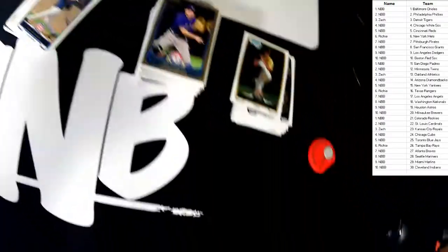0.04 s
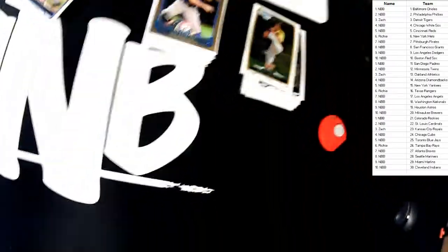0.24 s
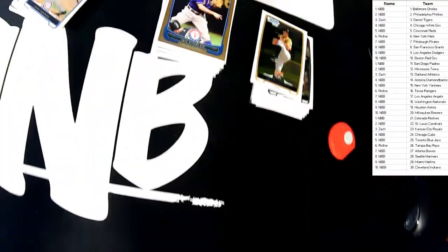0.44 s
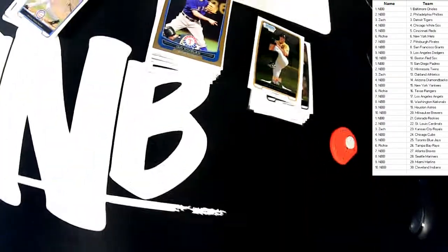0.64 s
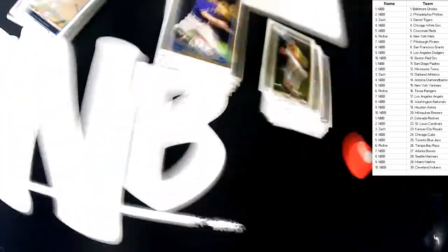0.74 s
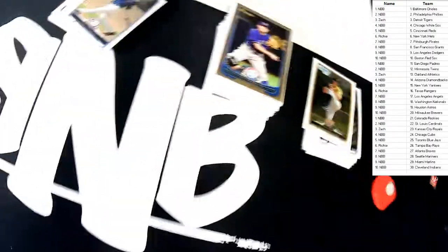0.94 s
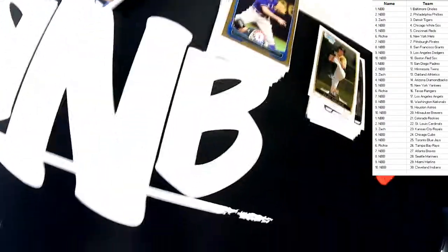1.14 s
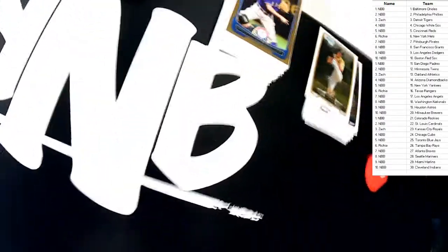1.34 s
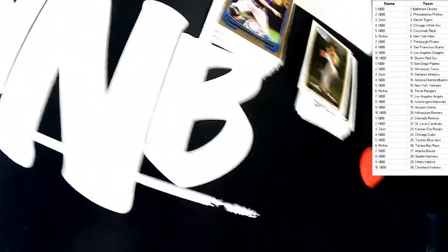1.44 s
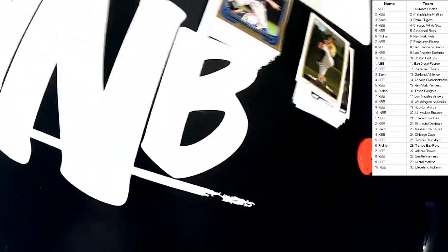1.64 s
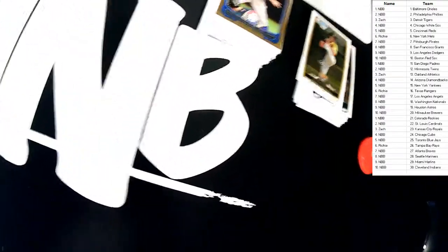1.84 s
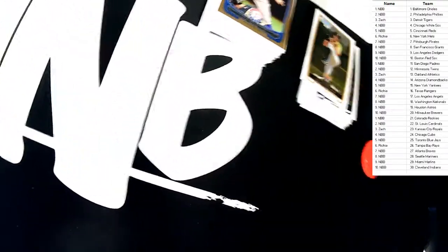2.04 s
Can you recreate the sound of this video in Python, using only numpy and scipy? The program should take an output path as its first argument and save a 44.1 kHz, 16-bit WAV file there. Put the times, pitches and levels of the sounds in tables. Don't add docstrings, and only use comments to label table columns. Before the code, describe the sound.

Handling noise of a small plastic camera on its mount: a loud sharp clack, a longer rattling cluster of knocks, then sparse soft taps and creaks, heard by its own microphone over faint room hiss.

```python
import sys
import numpy as np
from scipy import signal
from scipy.fft import rfft, irfft
from scipy.io import wavfile

SR = 44100
rng = np.random.default_rng(int(sys.argv[2]) if len(sys.argv) > 2 else 0)


def gain_from_decibels(decibels):
    exponent = np.asarray(decibels, float) / 20
    return 10 ** exponent


def inscribe(sig):
    pcm = np.round(np.clip(np.atleast_2d(sig).T, -1, 1) * 32767)
    wavfile.write(sys.argv[1], SR, pcm.astype(np.int16))


N = 92610

# frequency in Hz, level in dB, t60 in s.
PANEL = [(500.3, -17.5, .05), (703, -4, .025), (816.7, -5.5, 0.067), (941, -2, 0.044), (1151, -4, 0.047)]
# frequency in Hz, level in dB, t60 in s.
WALLS = [(1838.4, -5.5, 0.035), (2025.7, -5, 0.052), (2208, -6, 0.042), (2339, -9.5, 0.047),
         (2670, -16, 0.025)]
# frequency in Hz, level in dB, t60 in s.
CLIP = [(3283, -12.5, 0.051), (3739, -5, 0.048), (3834.5, 0, .04), (3975, -20.5, .03), (4600, -28.5, 0.018)]
CONTACT_CYCLES = [3.5, 5.2, 8.2]
# start in s, then level in dB on panel, walls and clip.
KNOCKS = [(.2265, -17.5, -28.5, -59.5), (.231, -15, -12, -36.5), (.233, -6.5, -6.5, -27.5),
          (.2358, -10, -4.5, -24), (.2445, -13, -27, -53), (.267, -25, -22.5, -55), (.276, -21.5, -19, -57),
          (.6098, -2, -11, -27.5), (.6165, -2, -12.5, -21), (.627, -18.5, -28, -25),
          (.639, -20.5, -20, -19), (.651, -22, -15, -20.5), (.6562, -7.5, -10, -20),
          (.661, -20, -16, -13.5), (.668, -27, -16, -28), (.677, -26.5, -26.5, -19.5),
          (.684, -14, -22.5, -31.5), (.688, -6, -5, -24.5), (.6955, -26, -26, -11), (.7115, -14, -15, -19),
          (.726, -33.5, -37.5, -34.5), (.760, -27.5, -42, -60)]


def seconds():
    return np.arange(N) / SR


def rms_one(x):
    return x / np.sqrt(np.mean(x ** 2) + 1e-20)


def slow_chance(hz):
    lowpass = signal.butter(2, hz, fs=SR, output="sos")
    return rms_one(signal.sosfilt(lowpass, rng.standard_normal(N)))


def swell(start, length, rise):
    u = (seconds() - start) / length
    return np.sin(np.pi / 2 * np.clip(np.minimum(u / rise, (1 - u) / (1 - rise)), 0, 1)) ** 2


def ring(force, hz, t60):
    r, w = gain_from_decibels(-60 / (t60 * SR)), 2 * np.pi * hz / SR
    return signal.lfilter([0, np.sin(w)], [1, -2 * r * np.cos(w), r * r], force + 1e-18)


def soften(force, hz, cycles):
    r, w = gain_from_decibels(-60 * hz / (cycles * SR)), 2 * np.pi * hz / SR
    return signal.lfilter([(1 - r * r) / 2, 0, (r * r - 1) / 2], [1, -2 * r * np.cos(w), r * r], force + 1e-18)


def slips():
    slips_per_s, spread_db = 1800, 4.5
    sizes = gain_from_decibels(spread_db * np.minimum(rng.exponential(1, N), 4)) * rng.choice([-1, 1], N)
    return rms_one(sizes * (rng.random(N) < slips_per_s / SR))


def knock_force(rows, part):
    part_gain_db = [-2.5, -0.5, 2]
    scatter_db = 2.5
    rows = np.array(rows)
    luck, force = rng.standard_normal((len(rows), 2)), np.zeros(N)
    db = rows[:, 1 + part] + part_gain_db[part] + scatter_db * luck[:, 0]
    np.add.at(force, (rows[:, 0] * SR).astype(int), gain_from_decibels(db) * np.sign(luck[:, 1]))
    return force


def hum():
    # frequency in Hz, rms level in dB.
    lines = [(60, -71.5), (120, -75.5), (240, -79.5), (12700, -89.5)]
    return sum(gain_from_decibels(db) * np.sqrt(2) * np.sin(2 * np.pi * hz * seconds()) for hz, db in lines)


def hiss():
    # frequency in Hz, level in dB.
    colour = [(25, -2), (250, -3.5), (330, -6.5), (800, -1), (1440, -19), (2400, -8.5), (4800, -24.5),
              (12000, -21.5)]
    # time in s, gain in dB.
    gain_swing = [(0, 10.5), (.88, 7), (0.979, 3.5), (1.28, 5.5), (1.45, 8.5), (1.7, 4.5), (2.0, 6),
                  (2.1, 10)]
    level_db = -72.5
    hz = np.maximum(np.fft.rfftfreq(N, 1 / SR), 20)
    colour_hz, colour_db = np.transpose(colour)
    shape = gain_from_decibels(np.interp(np.log(hz), np.log(colour_hz), colour_db))
    shape = shape / (1 + (hz / 13900) ** 24)
    noise = rms_one(irfft(rfft(rng.standard_normal(N)) * shape, N))
    return gain_from_decibels(level_db + np.interp(seconds(), *np.transpose(gain_swing))) * noise


def arm():
    # start in s, level in dB, frequency in Hz, t60 in s.
    thumps = [(0.233, -20, 114, 0.087), (.26, -38.5, 45.5, 0.22), (0.548, -48.5, 184, 0.086),
              (0.612, -30.5, 104.5, 0.22), (.615, -27.5, 37.4, 0.21), (1.262, -49.5, 140, .1),
              (1.389, -51.5, 130, 0.087), (1.701, -54.5, 220, .06), (0.71, -27.5, 40.7, 0.18),
              (.76, -35.5, 170, .06), (1.271, -39.5, 60, .1), (1.328, -37.5, 110, 0.083),
              (1.602, -50, 60.4, 0.14), (1.67, -42.5, 115, 0.071), (2.05, -49.5, 153, 0.078)]
    out = np.zeros(N)
    for start, db, hz, t60 in thumps:
        t = np.maximum(seconds() - start, 0)
        out += gain_from_decibels(db - 60 * t / t60) * (1 - np.exp(-t * hz * 2)) * np.sin(2 * np.pi * hz * t)
    return out


def bends():
    # start in s, length in s, first frequency in Hz, last frequency in Hz, level in dB.
    slides = [(.35, .05, 930, 990, -51), (.345, .04, 1350, 1400, -59), (.325, .07, 2150, 2300, -55),
              (.49, .06, 1130, 1260, -49), (.49, .05, 2180, 2350, -55), (.5, .04, 2750, 2800, -60),
              (.54, .05, 820, 850, -54), (.37, .06, 250, 250, -62), (.48, .05, 245, 245, -64),
              (1.58, .14, 330, 300, -59), (1.32, .06, 2350, 2400, -54), (1.435, .035, 950, 900, -48),
              (1.435, .035, 1800, 1950, -54), (1.81, .04, 380, 350, -64)]
    out = np.zeros(N)
    for start, length, from_hz, to_hz, db in slides:
        hz = np.interp(seconds(), [start, start + length], [from_hz, to_hz])
        phase = 2 * np.pi * np.cumsum(hz) / SR + 1.3 * slow_chance(60)
        roughness_db = 3.0 * slow_chance(40)
        out += gain_from_decibels(db + 3 + roughness_db) * swell(start, length, 0.38) ** 0.55 * np.sin(phase)
    return out


def squeaks():
    # start in s, length in s, frequency in Hz, rms level in dB.
    creeps = [(0.816, .13, 825, -53), (.274, .017, 2000, -23.5), (1.58, 0.042, 830, -37.5),
              (1.58, 0.053, 2370, -44.5), (0.103, 0.045, 815, -39), (1.315, .035, 820, -39),
              (2.03, 0.029, 965, -41), (0.772, 0.065, 550, -57.5), (.005, 0.028, 3600, -48),
              (2.052, .016, 3830, -46.5), (1.302, 0.039, 3800, -45), (.26, .06, 350, -51.5),
              (1.4, .035, 640, -43), (1.245, 0.032, 370, -51), (0.693, .12, 350, -53.5),
              (1.7, .07, 360, -53)]
    flutter_hz, flutter_db, wander_rad = 25, 2.5, 0.59
    flutter = gain_from_decibels(flutter_db * slow_chance(flutter_hz))
    wander = wander_rad * slow_chance(flutter_hz)
    out = np.zeros(N)
    for start, length, hz, db in creeps:
        tone = np.sin(2 * np.pi * hz * seconds() + wander)
        out += gain_from_decibels(db + 3) * swell(start, length, .3) ** .6 * tone
    return flutter * out


def chatter():
    # start in s, level in dB, t60 in s.
    cracks = [(0.2344, -29, .012), (0.24, -52, .03), (0.277, -70, .08), (0.59, -52, .03), (.597, -58, .03),
              (0.6098, -40.5, .012), (0.616, -42.5, .02), (0.619, -43.5, .025), (.628, -54.5, .03),
              (.6382, -51.5, .02), (.644, -52, .03), (0.655, -53, .03), (.664, -52, .04),
              (0.6763, -45.5, .022), (0.6943, -41.5, .025), (.707, -59, .02), (.711, -51, .03),
              (.716, -55.5, .03), (1.269, -69.5, .04)]
    # frequency in Hz, level in dB, contact length in cycles.
    fizz = [(5117, 0, 15), (7700, -3.5, 15), (8500, -4, 18), (11213, -2.5, 18.0), (12800, -12, 22.0)]
    rise_s, tick_delay_s, tick_db = 0.00068, .001, 8.5
    burst = np.zeros(N)
    for start, db, t60 in cracks:
        t = seconds() - start
        burst += gain_from_decibels(db - 60 * np.maximum(t, 0) / t60) * np.clip(t / rise_s, 0, 1)
    ticks, (start, db, _) = np.zeros(N), np.transpose(cracks)
    ticks[((start + tick_delay_s) * SR).astype(int)] = gain_from_decibels(db + tick_db)
    out = np.zeros(N)
    for hz, db, cycles in fizz:
        unsteady_db = 2.4 * slow_chance(60)
        grit = soften(burst * slips() + ticks, hz, cycles)
        out += gain_from_decibels(db + 13.5 + unsteady_db) * soften(grit, hz, 16.0)
    return out


def pings():
    # start in s, frequency in Hz, level in dB, t60 in s.
    strikes = [(.2335, 764, -8, 0.032), (.236, 938, -1, .022), (.617, 680, -12, .04),
               (.2355, 2700, -13.5, .02), (0.2356, 1764, -14, 0.018), (0.6116, 4300, -15.5, .004),
               (1.3025, 963, -7, .036), (1.303, 1110, -16.5, 0.038), (1.3034, 1822, -16, .034),
               (1.303, 2157, -13, .034), (1.304, 2287, -22.5, 0.044), (1.305, 2890, -37.5, 0.038),
               (1.403, 2870, -46.5, 0.029), (1.407, 3290, -58, 0.072), (1.813, 2050, -49.5, 0.028),
               (.268, 450, -30, .08), (1.918, 3260, -49.5, 0.044), (.277, 620, -28, .06),
               (1.982, 3240, -58, 0.039), (1.982, 2060, -51, 0.035), (1.981, 993, -39, 0.039),
               (2.037, 3820, -44, 0.036), (2.037, 3300, -56, .03), (.611, 530, -17, .06),
               (1.303, 535, -32, .05)]
    out = np.zeros(N)
    for start, hz, db, t60 in strikes:
        t = np.maximum(seconds() - start, 0)
        out += gain_from_decibels(db - 60 * t / t60) * (1 - np.exp(-t / .0009)) ** 2 * np.sin(2 * np.pi * hz * t)
    return out


def rubs():
    # start in s, length in s, then level in dB on panel, walls and clip.
    strokes = [(-.03, 0.092, -49.5, -54, -41.5), (0.025, 0.13, -36.5, -35, -49.5),
               (0.106, .11, -48.5, -68, -62.5), (0.23, .010, -17, -14, -41), (.19, 0.043, -59, -56, -71),
               (0.259, 0.039, -28, -27, -60), (0.279, .14, -51.5, -45.5, -50.5),
               (0.357, 0.18, -66.5, -60.5, -53.5), (.46, 0.12, -53, -48.5, -52),
               (0.527, 0.099, -50.5, -47, -46), (0.586, 0.018, -36.5, -32, -28.5),
               (0.598, 0.12, -33, -28, -35), (0.672, 0.064, -25, -30, -36),
               (0.732, 0.083, -47.5, -56.5, -70), (1.238, 0.066, -53, -50, -68),
               (1.277, 0.038, -56, -55.5, -66), (1.305, 0.052, -47, -51, -55),
               (1.426, 0.048, -42.5, -50, -72), (1.584, 0.044, -44, -43, -64.5),
               (1.613, 0.042, -60, -57, -70), (1.69, 0.083, -56.5, -63.5, -72),
               (0.896, 0.47, -72, -73, -76.5), (1.797, 0.096, -66, -62, -66.5), (1.86, .07, -60, -65, -68),
               (1.903, 0.12, -64, -61.5, -62), (2.022, 0.11, -48, -48.5, -65)]
    scatter_db, low_hz = 4.0, 796
    strokes = np.array(strokes)
    shapes = np.array([swell(row[0], row[1], .25) for row in strokes])
    out = np.zeros(N)
    for part, modes in enumerate([PANEL, WALLS, CLIP]):
        level_db, cycles = strokes[:, 2 + part], CONTACT_CYCLES[part]
        for hz, db, t60 in modes:
            pressure = gain_from_decibels(level_db + scatter_db * rng.standard_normal(len(strokes))) @ shapes
            force = slips() * pressure * np.sqrt(14 / (t60 * SR))
            force = force * min(hz / low_hz, 1) ** 4.6
            rung = ring(force, hz, t60)
            out += gain_from_decibels(db) * soften(soften(rung, hz, cycles), hz, cycles)
    return out


def box_jump():
    # frequency in Hz, level in dB, t60 in s.
    box = [(170, -21, .03), (249.5, -19.5, .03), (352.3, -22, 0.043)]
    out = np.zeros(N)
    for hz, db, t60 in box:
        out += gain_from_decibels(db) * ring(soften(knock_force(KNOCKS, 0), hz, 1.6), hz, t60)
    return out


def knocks():
    # start in s, then level in dB on panel, walls and clip.
    taps = [(.151, -36, -58, -68), (1.026, -55, -60, -78), (1.270, -40, -53, -54), (1.303, -26, -30, -54),
            (1.360, -52, -54, -57), (1.4025, -32.5, -28.5, -61), (1.436, -37.5, -48, -77),
            (1.584, -31, -38, -63), (1.699, -39, -39, -62), (1.729, -37, -50, -75), (1.813, -56, -51, -59),
            (1.980, -46, -60, -65), (1.985, -42, -55, -60), (2.031, -39, -43.5, -63)]
    grip_damping = 0.59
    hits = np.concatenate([KNOCKS, taps])
    out = np.zeros(N)
    for part, modes in enumerate([PANEL, WALLS, CLIP]):
        cycles = CONTACT_CYCLES[part]
        for hz, db, t60 in modes:
            rung = ring(knock_force(hits, part), hz, t60 * grip_damping)
            out += gain_from_decibels(db) * soften(soften(rung, hz, cycles), hz, cycles)
    return out


def scene():
    background = hum() + hiss() + arm()
    joints = bends() + squeaks() + chatter()
    shell = pings() + rubs() + box_jump() + knocks()
    return (background + joints + shell)[None]


def top_cut(x):
    return signal.sosfilt(signal.butter(12, 16470, fs=SR, output="sos"), x)


def record(dry):
    clip_top, knee, cutoff_hz = 0.69, 24, 18000
    x = dry / (1 + np.abs(dry / clip_top) ** knee) ** (1 / knee)
    x = signal.sosfilt(signal.cheby2(10, 60, cutoff_hz, fs=SR, output="sos"), x)
    return top_cut(x)


dry = scene()
out = record(dry)
inscribe(out)
```